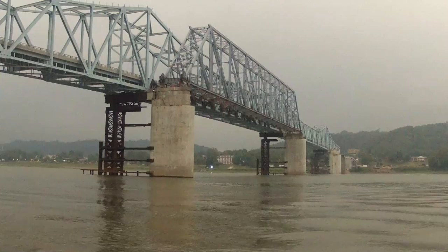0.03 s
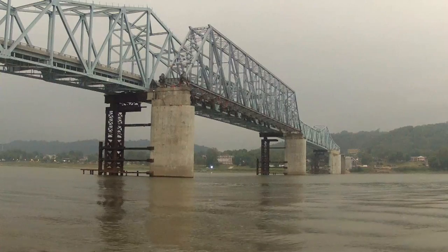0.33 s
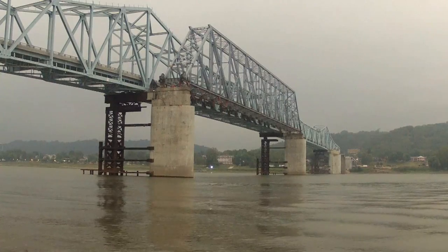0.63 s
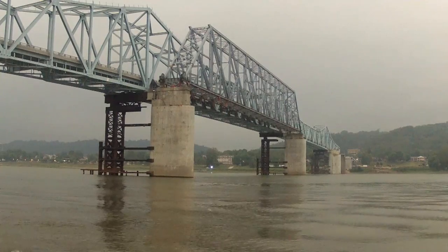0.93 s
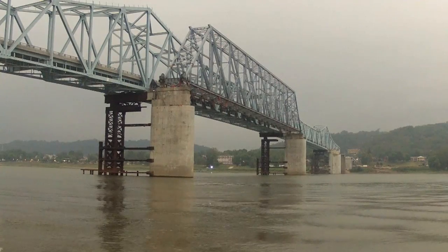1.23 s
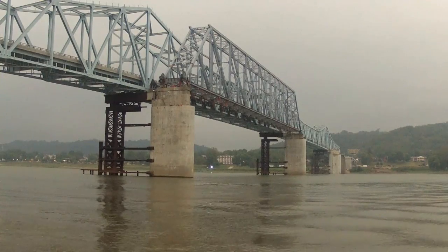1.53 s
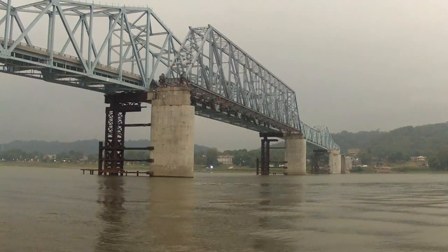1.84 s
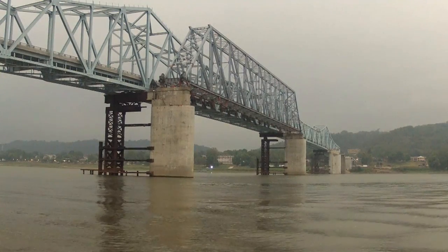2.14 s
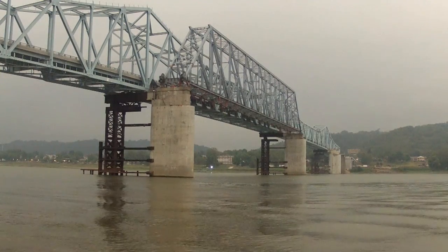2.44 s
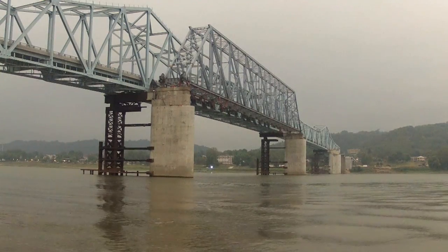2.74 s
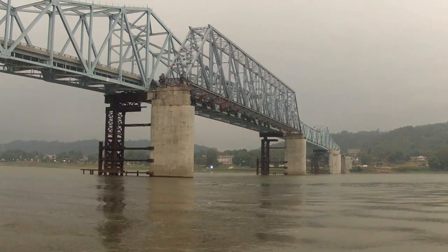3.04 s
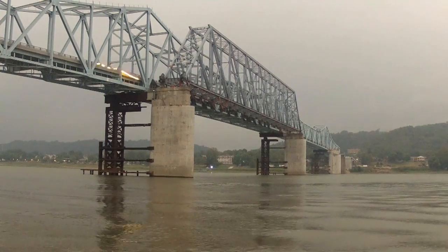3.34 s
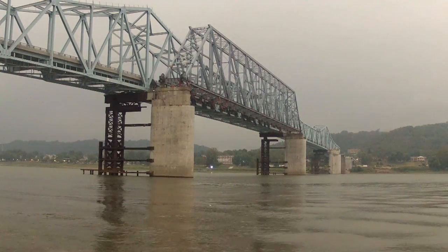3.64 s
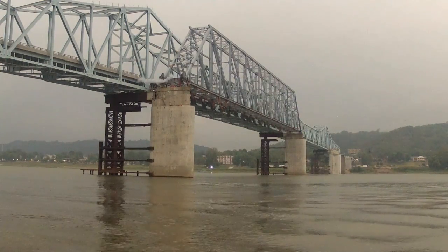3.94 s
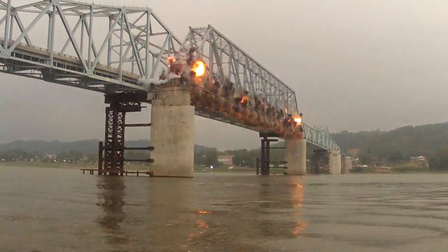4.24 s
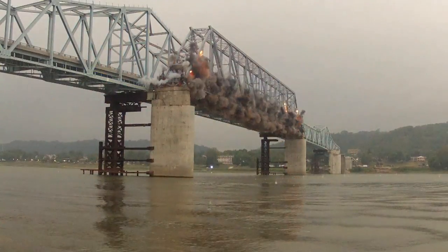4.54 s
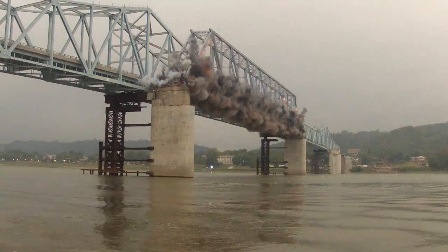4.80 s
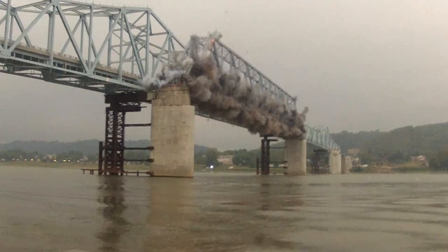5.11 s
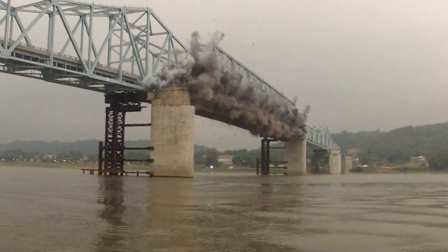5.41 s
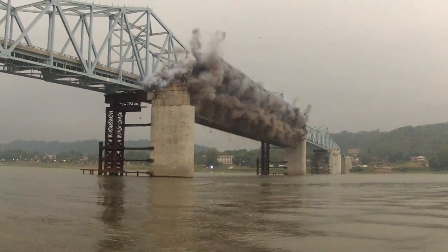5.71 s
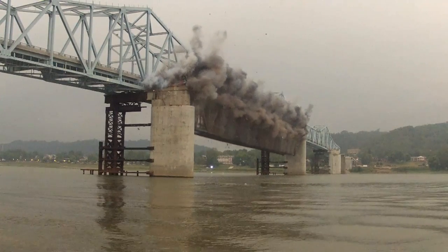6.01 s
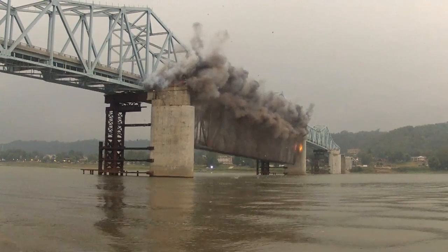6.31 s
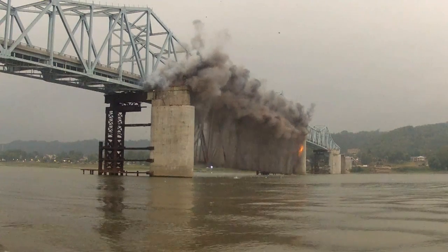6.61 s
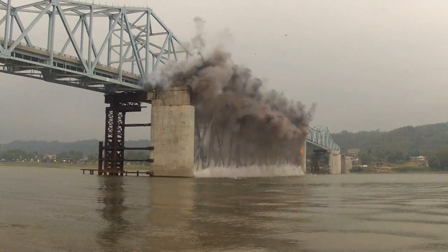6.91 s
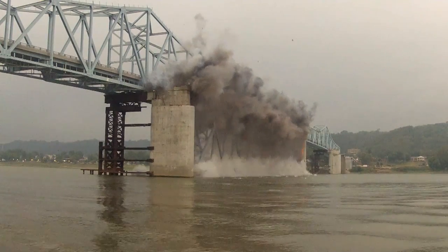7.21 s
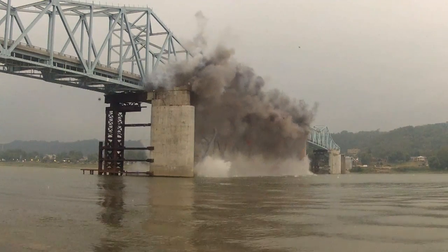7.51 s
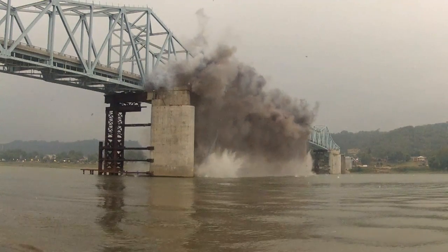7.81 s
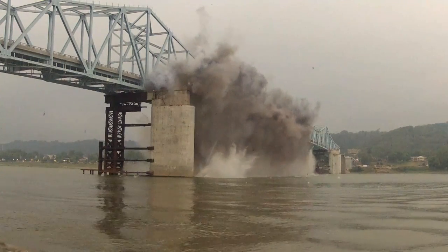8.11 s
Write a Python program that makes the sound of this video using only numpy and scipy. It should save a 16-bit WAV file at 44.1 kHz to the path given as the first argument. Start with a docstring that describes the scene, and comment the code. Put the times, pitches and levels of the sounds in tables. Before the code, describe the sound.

For the first three and a half seconds there is only a faint wash of river water, with a few soft laps against a boat. At about 3.6 seconds a quick cluster of sharp knocks and ticks strikes the hull, with a brief rattle and low drone. At 4.2 seconds the demolition charges on a steel bridge go off with a very loud crack. A rapid, crackling volley follows from 4.5 seconds, ending in a heavy bang at about 5 seconds and slightly overloading the microphone. Deep, thunder-like echoes then roll along the valley. Falling steel adds clattering blows at about 5.4 seconds and again around 6.5 seconds. At 7.3 seconds the span hits the river with a heavy slap and a burst of spray. The low rumble continues, fading, until the end just after 8 seconds.

```python
"""Bridge demolition from a boat.

Charges cut a steel span. The shock arrives through the water first and knocks on the hull; then the
air blasts crack in a volley and overload the recorder. Echoes roll along the valley while the span
falls and slaps into the river. Water laps at the boat. A camera's plastic housing colours the sound."""
import sys
import numpy as np
from scipy import signal
from scipy.fft import rfft, irfft, next_fast_len
from scipy.io import wavfile
from scipy.ndimage import uniform_filter1d, map_coordinates

SR = 44100
rng = np.random.default_rng(int(sys.argv[2]) if len(sys.argv) > 2 else 0)


def transcribe(signal):
    """Save signal, clipped to [-1, 1], as a 16-bit WAV file at the path in sys.argv[1]."""
    frames = np.atleast_2d(signal).T
    limited = np.clip(frames, -1, 1)
    pcm = np.round(limited * 32767).astype(np.int16)
    wavfile.write(sys.argv[1], SR, pcm)


N = 368235

# loudest air blasts: (time [s], crack [dB], push [dB])
BLASTS = [(4.164, -5.5, -4), (4.1665, -3.5, -5), (4.185, -14, -14), (4.210, -18, -8), (4.307, -9, -26),
          (4.484, -4.5, -21), (4.502, -3, -24), (4.546, -5, -18), (4.549, -9, -4), (4.603, -10.5, -6),
          (4.660, -11, -2), (4.674, -11, -7), (4.777, -19, -11), (4.838, -13.5, -13), (4.882, -13, -5),
          (4.934, -12, -4), (4.999, -13, -3.5), (5.040, -2.5, -1)]
# blows of falling steel and of the span on the water: (time [s], crack [dB], push [dB])
STEEL_BLOWS = [(5.356, -20.5, -18), (6.429, -24, -13), (6.456, -24, -25), (6.611, -27, -16),
               (6.815, -42, -13), (7.307, -28, -9), (7.312, -23.5, -16), (7.349, -32, -13),
               (7.752, -33, -18)]

# roar surges: (time [s], rise [s], hold [s], base decay [dB/s],
#               boom [dB], rumble [dB], body [dB], clatter [dB])
VOLLEY_SURGES = [(4.166, 0.011, 0.024, 58, -64, -28.5, -19.5, -22.5),
                 (4.17, 0.044, 0.3, 90, -68, -33.5, -22.5, -21.5),
                 (4.545, 0.069, 0.422, 327, -30, -19.3, -27.5, -21)]  # truss answers, quick run of charges, heavier run
FALL_SURGES = [(5.04, 0.12, 0.13, 35, -21, -21.5, -26, -22.5),
               (5.31, .2, 0.072, 19.8, -20.5, -19, -21.5, -20.5),
               (5.6, 0.54, 1.13, 4.9, -34.5, -30, -34.5, -38),
               (6.39, 0.033, .02, 50, -27, -34, -31.5, -35.5),
               (6.53, 0.044, 0.066, 32, -26, -33, -40.5, -38.5)]  # bank thunder, main roll, valley echo, steel tears, span breaks free
SPLASH_SURGES = [(7.307, 0.072, 0.093, 37, -43, -23.5, -25, -24)]  # span hits the river

# water-borne shocks on the hull: (time [s], level [dB], high mode [Hz], high mode gain [dB],
#                                  low mode [Hz], low mode gain [dB], tick T60 [s])
HULL_KNOCKS = [(3.581, -27.5, 1870, 6.5, 960, -3.5, 0.038), (3.594, -34.5, 1600, 4, 1100, -3, 0.054),
               (3.651, -33.5, 1690, 9, 173, 9, 0.045), (3.779, -26.5, 2510, -16, 850, -5, 0.018),
               (3.847, -36, 2500, -8, 400, -16, .03), (3.897, -21.5, 2450, -1, 1810, -24, 0.045),
               (3.907, -24.5, 2710, 2, 2160, -4, 0.065)]
# boat shaking: (time [s], rise [s], hold [s], base decay [dB/s], drone [dB], rattle [dB])
HULL_SHAKES = [(3.581, .004, .008, 130, -62, -39), (3.645, 0.0089, 0.012, 25.5, -40.5, -37)]
# small passing waves: (time [s], rise [s], hold [s], decay [dB/s], level [dB])
WAVELETS = [(1.15, 0.19, 0.22, 14, -59.5), (2.68, 0.16, .12, 26, -57)]
# splashes on the boat: (time [s], level [dB], length [s])
LAPS = [(.80, -60.5, 0.23), (1.37, -70, .05), (2.309, -58, .03), (2.87, -68, .08), (2.94, -71, .05)]

# source spectra ahead of the housing: (frequency [Hz], relative density [dB])
CRACK_SPECTRUM = [(60, -8.5), (220, 1), (420, 3.5), (800, 1), (1300, -9), (2700, -4.5), (4500, -11),
                  (7000, -15), (11000, -19.5), (15000, -25.5)]  # blast fronts
TRUSS_SPECTRUM = [(160, -30), (260, -3), (370, 2.5), (520, -1), (700, -6), (1000, -9), (1300, -24),
                  (1600, -44), (3000, -38)]  # body of the volley's echoes
BOOM_SPECTRUM = [(20, -27), (30, -10), (38, -18), (46.5, 7), (57, -5.5), (66, -6), (80, -5), (130, -64)]  # deepest echoes
RUMBLE_SPECTRUM = [(45, -29.5), (74, -3.5), (120, -3), (155, -5.5), (190, -5), (240, -11.5), (450, -41.5)]  # low echoes
CLATTER_SPECTRUM = [(700, -24.5), (1300, -7), (1700, -3), (2600, -1.5), (3400, -8), (4200, -10.5),
                    (6000, -32.5), (8000, -13.5), (9500, -13), (11800, -19.5), (15000, -16.5)]  # sharp echoes, steel blows
THUNDER_SPECTRUM = [(130, -36.5), (250, -0.5), (350, 1), (480, -4), (680, -3.5), (950, -8.5), (1250, -10),
                    (1600, -14), (3000, -41.5)]  # body of the valley's echoes
PLUNGE_SPECTRUM = [(130, -29), (230, 2.5), (350, 2), (480, -4), (680, -2), (950, -10), (1250, -17),
                   (1600, -23), (3000, -45)]  # span entering the water
SPRAY_SPECTRUM = [(1600, -16.5), (2700, 0.5), (3600, -3), (5000, -9.5), (7000, -17), (11000, -18),
                  (15000, -23)]  # laps, treble of fall and splash
DRONE_SPECTRUM = [(70, -20.5), (125, 2), (190, 2), (270, 2.5), (420, 2.5), (650, -5), (1000, -1.5),
                  (2000, -19)]  # shaken hull
RATTLE_SPECTRUM = [(300, -11), (1000, -6), (2000, 0), (2800, -8), (4200, -8), (6200, -23), (8000, -14),
                   (10000, -15), (12000, -27), (14500, -18)]  # hull ticks and rattle
RIVER_SPECTRUM = [(20, -12), (60, -1.5), (125, -3), (250, -4), (550, -12), (1150, -17.5), (1430, -15),
                  (1660, -12), (2000, -17), (2700, -19.5), (4200, -21.5), (6000, -28.5), (9800, -28),
                  (11800, -41), (14200, -31)]  # steady wash
WAVELET_SPECTRUM = [(100, 0), (300, -2.5), (800, -4.5), (1200, -10), (1700, -1), (2700, -10.5),
                    (4200, -13.5), (6000, -23), (9800, -20), (14500, -31)]  # passing waves

# camera housing resonances: (centre [Hz], width [Hz], lift [dB])
HOUSING_MODES = [(119.9, 21.5, 6), (183.3, 15, 5.5), (784, 105, 5), (1662, 140, 6), (2022, 390, 6),
                 (2733, 660, 10), (2760, 140, 2), (3476, 102, 6), (9305, 810, 11), (10120, 320, 6.5),
                 (14520, 830, 13)]


def volley():
    """Charges fire in quick succession, wrapped in echoes from the truss."""
    bangs = shocks(BLASTS, CRACK_SPECTRUM, crack_t60_s=0.026, push_s=0.0033)
    crackle = shocks(lesser_charges(), CRACK_SPECTRUM, crack_t60_s=0.0097, push_s=0.0024)
    echoes = roar(VOLLEY_SURGES, TRUSS_SPECTRUM, rate_hz=700, front_share=0.44, flutter_db=1.16,
                  edge_spectrum=CRACK_SPECTRUM, edge_db=0.5)
    return bangs + crackle + echoes


def lesser_charges(count=18, first_s=4.62, last_s=5.02, crack_db=-15, push_db=-12.5, scatter_db=0.5):
    """Small charges fire unevenly between the loud ones; rows as in BLASTS."""
    times_s = first_s + (last_s - first_s) * (np.arange(count) + rng.random(count)) / count
    size_db = scatter_db * rng.standard_normal(count)
    return np.transpose([times_s, crack_db + size_db, push_db + size_db])


def collapse():
    """Thunder returns from the hills as steel tears and falls; the span hits the river, throwing spray."""
    blows = shocks(STEEL_BLOWS, CLATTER_SPECTRUM, crack_t60_s=0.07, push_s=0.0072)
    fall = roar(FALL_SURGES, THUNDER_SPECTRUM, rate_hz=2000, front_share=0.34, flutter_db=0.1,
                edge_spectrum=SPRAY_SPECTRUM, edge_db=-10)
    splash = roar(SPLASH_SURGES, PLUNGE_SPECTRUM, rate_hz=2500, front_share=0.39, flutter_db=0.9,
                  edge_spectrum=SPRAY_SPECTRUM, edge_db=-4.5)
    return blows + fall + splash


def shocks(events, spectrum, crack_t60_s, push_s):
    """Each shock: a pressure push, plus a crack of fronts scattered by girders and water."""
    t = np.arange(SR // 8) / SR
    blast_wave = (1 - t / push_s) * np.exp(-t / push_s)  # overpressure, then longer suction
    cracks, pushes = np.zeros(N), np.zeros(N)
    for time_s, crack_db, push_db in events:
        add(cracks, time_s, amp(crack_db - 60 * t / crack_t60_s) * rng.standard_normal(len(t)))
        add(pushes, time_s, amp(push_db) * blast_wave)
    # the microphone misses the slowest part of the push
    push_band = signal.butter(2, [55, 900], "bandpass", fs=SR, output="sos")
    return housing(cracks, spectrum) + signal.sosfilt(push_band, pushes)


def roar(surges, body_spectrum, rate_hz, front_share, flutter_db, edge_spectrum, edge_db):
    """Overlapping echoes: low ones merge into a boom, sharp ones clatter in the housing."""
    boom, rumble, body, clatter = swells(surges, decay_scales=(0.72, 0.78, 0.92, 0.96))  # bass lingers
    clumps = amp(flutter_db * wobble(rate_hz=90))
    echoes = unit(fronts(rate_hz, front_share) * clumps)
    low = boom * steady(housing(rng.standard_normal(N), BOOM_SPECTRUM))
    low += rumble * steady(housing(fronts(rate_hz=120, share=0.24), RUMBLE_SPECTRUM))
    high = body * unit(housing(echoes, body_spectrum))
    high += clatter * unit(housing(echoes, CLATTER_SPECTRUM))
    edge = unit(housing(fronts(rate_hz=700, share=0.2) * clumps, edge_spectrum))
    edge_gain = amp(edge_db) * np.sqrt(clatter / clatter.max())  # strong arrivals keep most treble
    return low + high + clatter * edge_gain * edge


def hull():
    """Each shock in the water knocks on the hull and rings a panel; the boat drones and rattles."""
    t = np.arange(SR // 4) / SR
    ticks, rings = np.zeros(N), np.zeros(N)
    ring_envelope = t / 0.0035 * np.exp(1 - t / 0.0027)  # builds over a few cycles, heavily damped
    for time_s, level_db, high_hz, high_db, low_hz, low_db, t60_s in HULL_KNOCKS:
        add(ticks, time_s, amp(level_db - 60 * t / t60_s) * rng.standard_normal(len(t)))
        high_mode = amp(high_db) * np.sin(2 * np.pi * high_hz * t)
        low_mode = amp(low_db) * np.sin(2 * np.pi * low_hz * t)
        add(rings, time_s, amp(level_db) * ring_envelope * (high_mode + low_mode))
    drone_gain, rattle_gain = swells(HULL_SHAKES, decay_scales=(1.44, 0.92))
    drone = drone_gain * unit(housing(fronts(rate_hz=370, share=0.34), DRONE_SPECTRUM))
    rattle = rattle_gain * fronts(rate_hz=560, share=0.27)
    return rings + drone + housing(ticks + rattle, RATTLE_SPECTRUM)


def river(wash_db=-57):
    """Moving water and the far shore make a faint wash; wavelets pass, ripples lap at the boat."""
    wave_gain, = swells(WAVELETS, decay_scales=[1])
    waves = wave_gain * unit(housing(fronts(rate_hz=500, share=0.25), WAVELET_SPECTRUM))
    t = np.arange(SR // 2) / SR
    lap_gain = np.zeros(N)
    for time_s, level_db, length_s in LAPS:
        age = 4 * t / length_s
        add(lap_gain, time_s, amp(level_db) * age * np.exp(1 - age))
    wash = amp(wash_db) * unit(housing(fronts(rate_hz=400, share=0.16), RIVER_SPECTRUM))
    laps = housing(lap_gain * fronts(rate_hz=550, share=0.5), SPRAY_SPECTRUM)
    return wash + waves + laps


def housing(x, spectrum, size=2 ** 14):
    """Unit-energy filter: source spectrum times the housing's resonances."""
    hz = np.fft.rfftfreq(size, 1 / SR)
    knots_hz, knots_db = np.transpose(spectrum)
    source_db = np.interp(np.log(hz + 1), np.log(knots_hz), knots_db)
    source_db += 12 * np.log2(np.minimum((hz + 1) / knots_hz[0], 1))  # skirts, dB/octave
    source_db -= 24 * np.log2(np.maximum(hz / knots_hz[-1], 1))
    modes_db = sum(lift / (1 + (2 * (hz - centre) / width) ** 2) for centre, width, lift in HOUSING_MODES)
    # minimum phase: rings only after it is struck
    cepstrum = irfft(np.log(amp(source_db + modes_db) + 1e-7))
    cepstrum[1:size // 2] *= 2
    cepstrum[size // 2 + 1:] = 0
    response = irfft(np.exp(rfft(cepstrum)))[:size // 2]
    return signal.oaconvolve(x, response / np.linalg.norm(response))[:N]


def fronts(rate_hz, share):
    """Random pressure fronts carry a share of the power; diffuse noise carries the rest."""
    arrivals = rng.random(N) < rate_hz / SR
    impulses = unit(arrivals * rng.uniform(-0.94, 1, N))
    return np.sqrt(share) * impulses + np.sqrt(1 - share) * rng.standard_normal(N)


def swells(surges, decay_scales):
    """One gain curve per layer: surges rise, hold, decay at a scaled rate and add in power."""
    power = np.zeros((len(decay_scales), N))
    for time_s, rise_s, hold_s, decay_db_per_s, *levels_db in surges:
        t = clock() - time_s
        attack = np.clip(t / rise_s, 0, 1)
        lost_db = decay_db_per_s * np.maximum(t - rise_s - hold_s, 0)
        power += [attack * amp(db - scale * lost_db) ** 2 for db, scale in zip(levels_db, decay_scales)]
    return np.sqrt(power)


def wobble(rate_hz):
    """Smooth random curve."""
    knots = rng.standard_normal(int(N * rate_hz / SR) + 4)
    return map_coordinates(knots, [clock() * rate_hz])


def steady(x):
    """Hold rms near 1 over 1/8 s: throbs without holes."""
    return x / np.sqrt(abs(uniform_filter1d(x ** 2, size=SR // 8)) + 1e-12)


def unit(x):
    """Scale to rms 1."""
    return x / np.sqrt(np.mean(x ** 2) + 1e-20)


def amp(db):
    """Decibels to gain."""
    return 10 ** (np.asarray(db) / 20)


def clock():
    """Sample times [s]."""
    return np.arange(N) / SR


def add(track, time_s, sound):
    """Mix a sound in at time_s."""
    part = track[round(time_s * SR):][:len(sound)]
    part += sound[:len(part)]


def gain_control(x, limit_db, recover_db_per_s, lag_s):
    """Gain drops lag_s after the level passes the limit, then recovers."""
    t = clock()
    level_db = 10 * np.log10(abs(uniform_filter1d(x ** 2, size=128)) + 1e-12)
    excess_db = np.maximum(level_db - limit_db, 0)
    ramp_db = recover_db_per_s * t
    held_db = np.maximum.accumulate(excess_db + ramp_db) - ramp_db
    late_db = np.interp(t - lag_s, t, held_db)
    return x * amp(-uniform_filter1d(late_db, size=88))


def scene():
    """Mono mix at the microphone."""
    return (volley() + collapse() + hull() + river())[None]


def record(dry, low_cut_hz=20, top_hz=15350, ceiling=0.9, start_s=0.08):
    """Shock fronts outrun the gain control and clip; output is band-limited, silent until start_s."""
    low_cut = signal.butter(3, low_cut_hz, "highpass", fs=SR, output="sos")
    x = signal.sosfilt(low_cut, dry[0])
    x = gain_control(x, limit_db=-6.5, recover_db_per_s=114, lag_s=0.0042)
    clipped = x / (1 + abs(x / ceiling) ** 6) ** (1 / 6)
    size = next_fast_len(N + SR // 2)
    passband = np.fft.rfftfreq(size, 1 / SR) < top_hz
    x = irfft(rfft(clipped, size) * passband, size)[:N]
    return (x * (clock() > start_s))[None]


dry = scene()
out = record(dry)
transcribe(out)
```